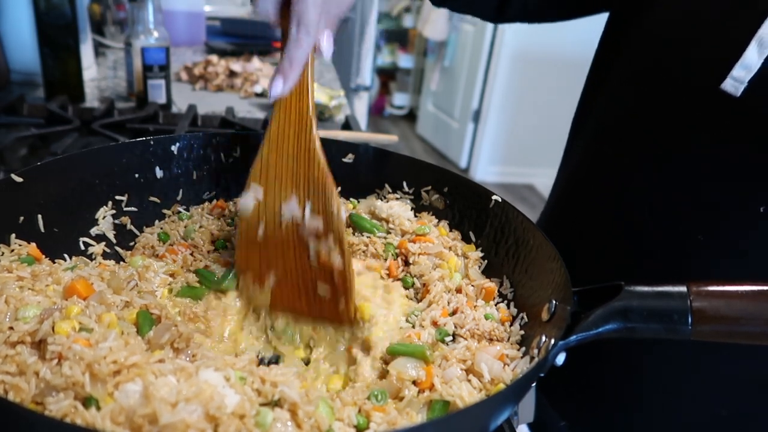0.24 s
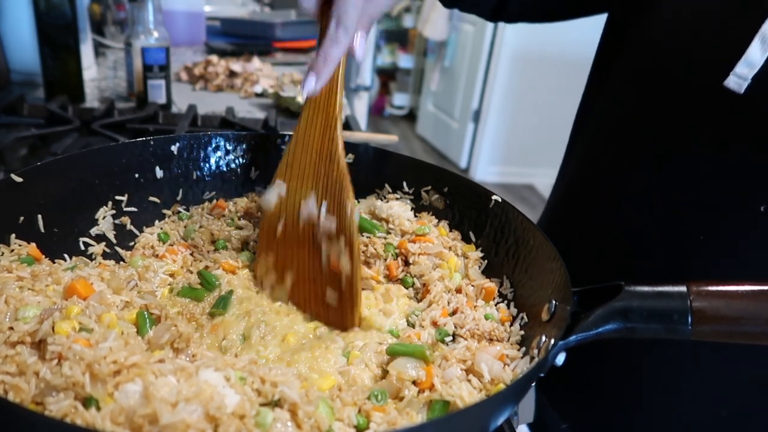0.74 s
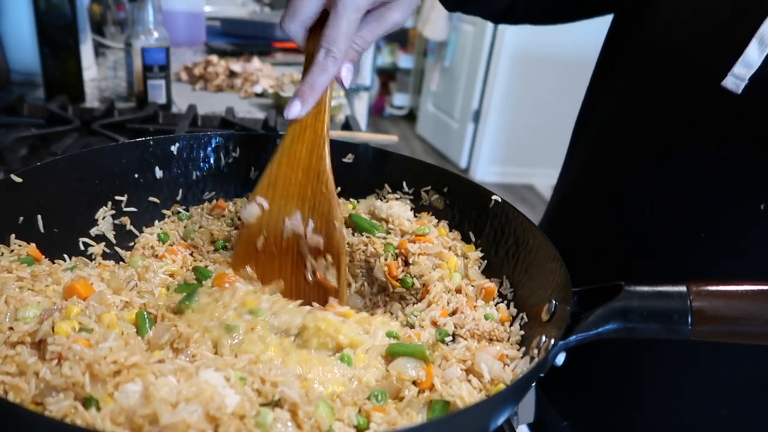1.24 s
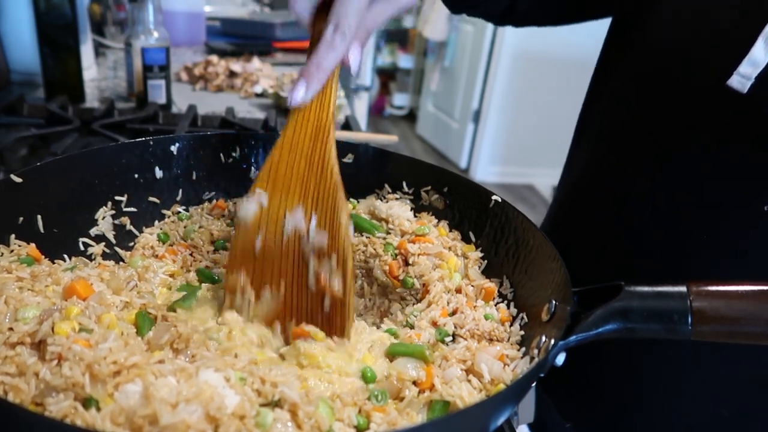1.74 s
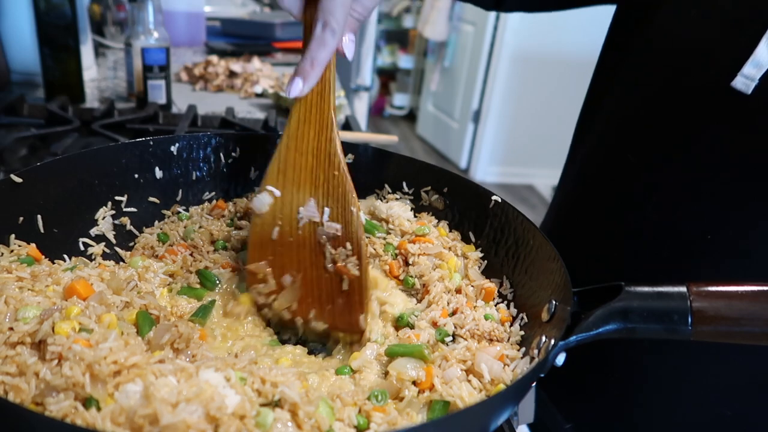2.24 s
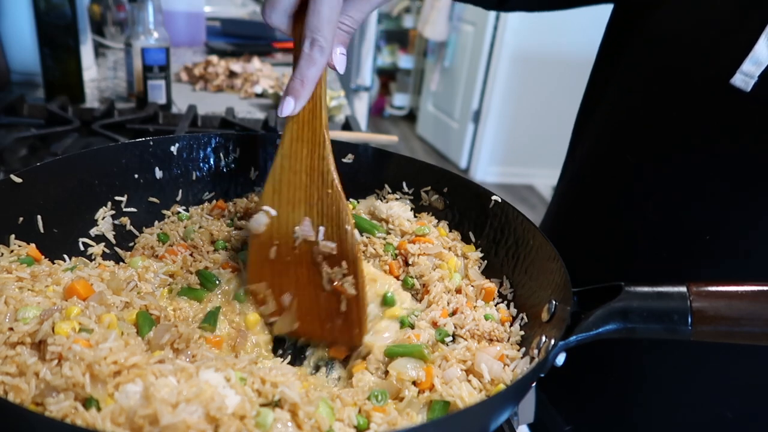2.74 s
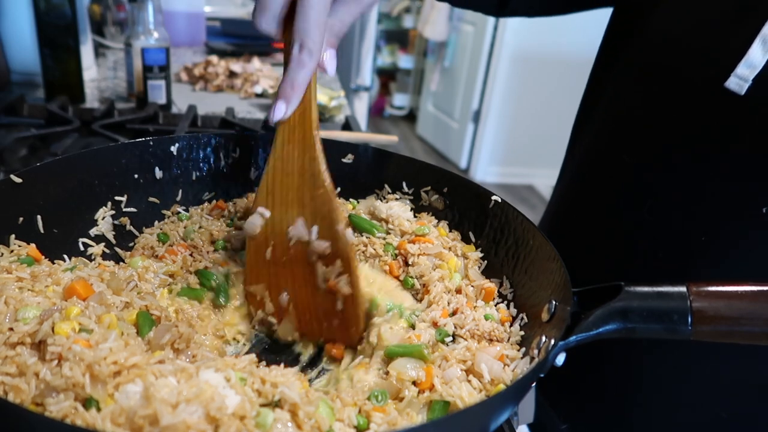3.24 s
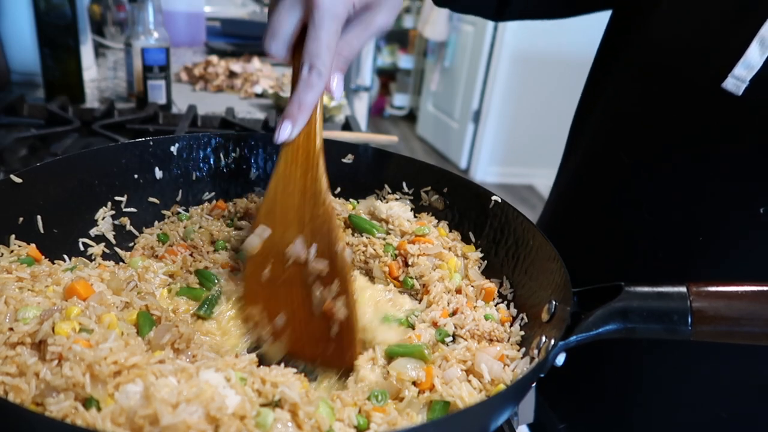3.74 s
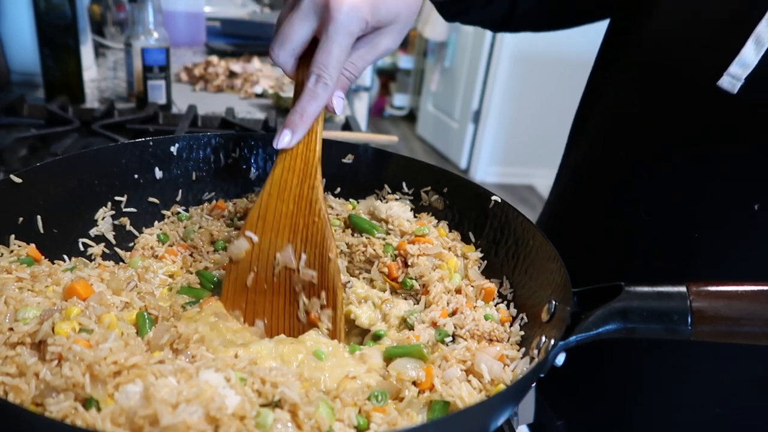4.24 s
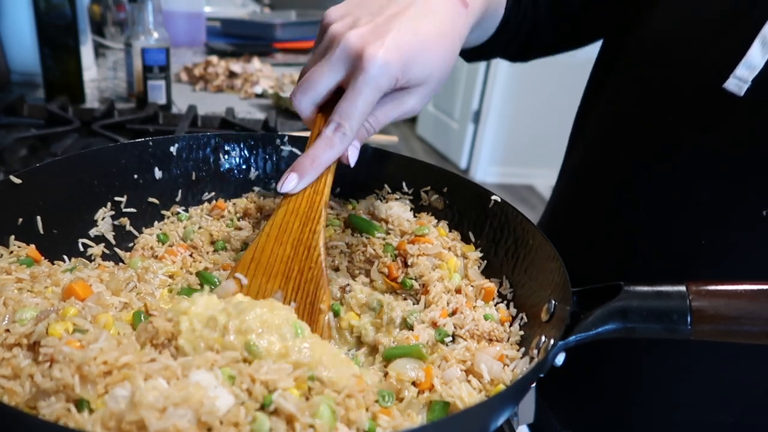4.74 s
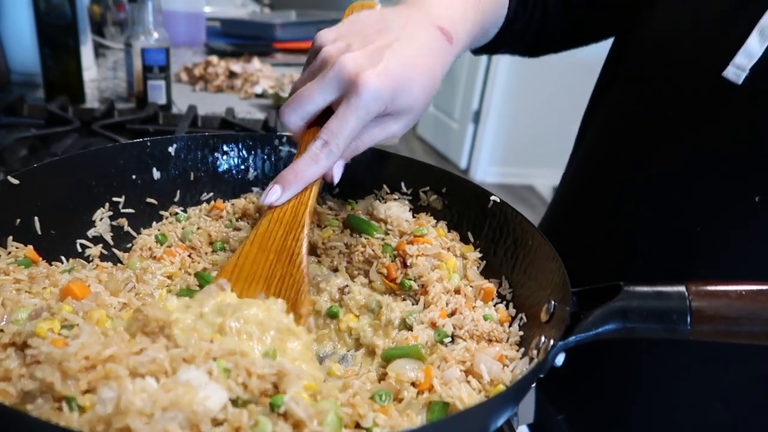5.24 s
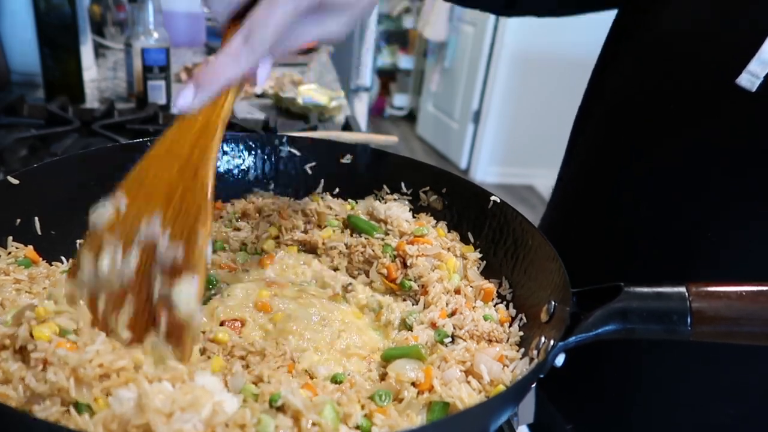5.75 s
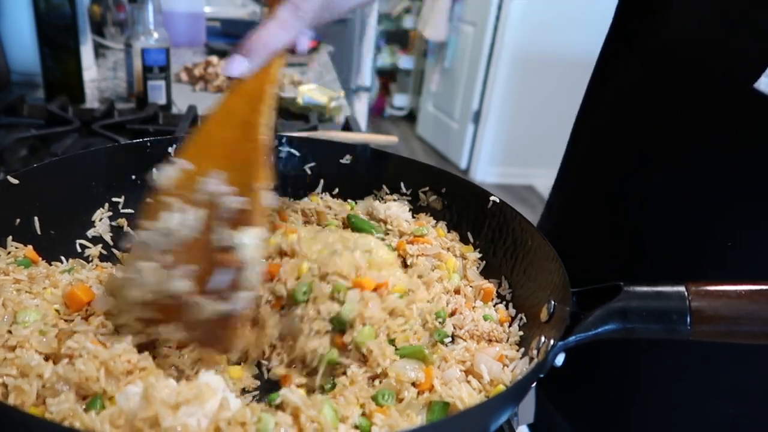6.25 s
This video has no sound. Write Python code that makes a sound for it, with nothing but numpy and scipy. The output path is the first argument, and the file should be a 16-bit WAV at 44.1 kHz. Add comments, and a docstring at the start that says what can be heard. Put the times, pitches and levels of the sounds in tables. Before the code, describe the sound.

Close wide stereo in a small kitchen, with a low stove murmur and faint hum beneath. Fine, bright, crackling sizzle continues throughout, dotted with tiny snaps. Soft pushes through rice start at once; a dull bump at 0.5 s, then a hard woody clack on the wok at 0.85. Around 1.2 s a strong crunchy shove and scrape come with thuds and a burst of sizzle, then a short scrape into another loud clack at 1.5. Stirring swishes near 2 s; knocks follow at 2.2, 2.45 and 2.7, then 3.5, 3.7 and 4.2, with short damped metal ring and pattering food. From 4.75 s blows give way to softer shoving, low rumble and fuller, steadier sizzle with frequent spits. At 5.9 s a heavy grainy turn with muffled thuds brings a sizzling flare and a cluster of sharp pops, frying on to the end at about 6.5.

```python
"""Kitchen stove, close stereo pair: egg fried rice sizzles in a wok as a wooden spatula chops and turns it.
Sizzle: random steam bursts, filtered, flaring as wet food meets hot metal; larger spits are damped rings.
Spatula: knocks ring damped modes of wok and blade; strokes, shoves and scrapes are filtered random bursts.
Knocks also make food patter and clumps drop; the wok's bare sides ring on. Stove murmur, hum and rumble below.
Room reflections, a phase-shifted microphone pair and a slowly recovering limiter shape the mix."""
import sys
import numpy as np
from scipy import signal
from scipy.fft import rfft, irfft, next_fast_len
from scipy.io import wavfile
from scipy.ndimage import uniform_filter1d, minimum_filter1d

SR = 44100
rng = np.random.default_rng(int(sys.argv[2]) if len(sys.argv) > 2 else 0)


def dump_mix(stems):
    """Bounce the given channels to the path in sys.argv[1] as a 16-bit WAV at rate SR."""
    frames = np.atleast_2d(stems).T  # one column per channel
    limited = np.clip(frames, -1, 1)  # hard clip at full scale
    pcm = np.round(limited * 32767).astype(np.int16)
    wavfile.write(sys.argv[1], SR, pcm)


N = 286650
TIME = np.arange(N) / SR  # s
SIZE = next_fast_len(N + SR)  # FFT length, samples
FREQ = np.arange(SIZE // 2 + 1) * SR / SIZE  # Hz

# Resting food, sizzle highest once the egg has spread over the metal: t/s, level/dB
SIMMER_LEVEL = [(0, -42), (1.8, -40), (2.8, -41), (4.0, -43), (4.72, -40), (4.9, -37.5), (5.5, -37.5),
                (6.5, -40)]
# Wet food pressed onto hot metal, boiling off, and brief fizzes right after spits: t/s, rise/s, fade/s, sizzle
# level/dB, spray level/dB
FLARES = [(.15, 0.063, 0.12, -36, -79), (.42, 0.08, 0.11, -38.5, -67), (.78, 0.082, 0.042, -35, -58),
          (1.172, 0.017, 0.16, -29.5, -38), (1.4, 0.12, 0.068, -32.5, -40.5),
          (1.6, 0.048, 0.44, -56, -43.5), (1.947, 0.012, 0.39, -36, -59), (3.1, 0.065, 0.69, -38.5, -73),
          (3.82, 0.025, 0.073, -44, -50), (4.791, 0.17, 0.29, -45, -44.5),
          (4.863, 0.0025, 0.012, -29.5, -36), (4.93, 0.0049, 0.019, -29.5, -44),
          (5.1, 0.14, 0.15, -37.5, -49), (5.34, 0.0021, 0.014, -27, -57), (5.555, .004, 0.064, -30, -56),
          (5.84, 0.16, 0.21, -28, -40), (6.367, 0.0022, 0.0097, -26, -33.5), (6.44, 0.037, .1, -32.5, -41)]
# Steam burst spectrum: f/Hz, relative level/dB
SIZZLE_SPECTRUM = [(100, -30), (400, -8), (560, -3.5), (710, -12), (850, -2), (1150, -1), (1500, -1.5),
                   (1700, -1), (1900, 0), (2500, 1.5), (3150, 2), (3390, 0.5), (3650, -1), (4100, -4),
                   (4380, -3.5), (4700, -6.5), (5200, -10.5), (7000, -12), (9000, -13), (13000, -78)]
# Fine spray spectrum: f/Hz, relative level/dB
SPRAY_SPECTRUM = [(1500, -25), (3500, -4), (5000, 1), (6500, 1.5), (8000, 0), (10000, 0), (12600, -3),
                  (14000, -8.5), (16000, -14)]
# Sizzle that differs at each capsule: f/Hz, gain/dB
DIFFUSE_GAIN = [(60, -30), (130, -23), (300, -18), (700, -18), (1400, -21), (2500, -17), (4400, -3),
                (7000, -4), (10000, -11), (15000, -7)]
# Stove murmur spectrum: f/Hz, relative level/dB
STOVE_SPECTRUM = [(20, -35), (40, -25), (75, -8.5), (110, 4), (150, -3), (250, -6.5), (500, -22.5),
                  (1000, -28), (4000, -20)]
# Deep rumble spectrum: f/Hz, relative level/dB
RUMBLE_SPECTRUM = [(20, -31), (38, 2), (70, -1.5), (100, 7), (150, -2.5), (200, -11), (1000, -27)]
# Deep rumble, swelling as the food is turned over: t/s, level/dB
RUMBLE_LEVEL = [(0, -58), (1.3, -49.5), (2, -58), (4.4, -56), (4.75, -57), (5.05, -43), (5.7, -47.5),
                (6.0, -40), (6.25, -47), (6.5, -51)]
# Blade pushes through the rice: t/s, length/s, level/dB
STROKES = [(0.162, 0.26, -39), (0.423, 0.4, -40), (1.173, 0.1, -23), (1.376, 0.2, -41), (1.978, 0.22, -29),
           (2.075, 0.39, -33), (2.345, 1, -39), (3.526, 0.43, -39.5), (4.774, 0.39, -39),
           (5.113, 0.53, -38), (5.884, 0.31, -27)]
# Tearing grain spectrum: f/Hz, relative level/dB
RICE_SPECTRUM = [(60, -20), (250, -32), (550, -5.5), (900, -4), (1400, 5), (2100, 1.5), (3500, -2.5),
                 (8000, -40.5)]
# Bare wok sides, undamped by food: f/Hz, level for a full knock before build-up/dB, t60/s
SIDE_MODES = [(99, -49, 0.37), (176, -46, 0.35), (247, -35.5, 0.47), (327.8, -39, 0.64), (455, -33, 0.25),
              (614, -35, 0.38), (735, -37, 0.16), (854, -39, 0.24), (1188, -36, 0.17), (3400, -44, .08)]
# Loud spits of oil and egg, grains snapping under the blade: t/s, peak level/dB, centre f/Hz
SPITS = [(.195, -17, 2510), (.841, -29, 2530), (.8532, -8.5, 3100), (1.133, -24, 3500), (1.19, -14, 3680),
         (1.212, -26, 3360), (1.3065, -17, 3290), (1.348, -14, 5550), (1.381, -25, 3330),
         (1.386, -16, 2700), (1.485, -14, 2800), (1.517, -3, 2750), (1.5825, -17, 3500),
         (1.656, -10.5, 4600), (1.916, -16.5, 2720), (2.0115, -27, 1920), (2.174, -16.5, 2480),
         (2.4505, -15, 4200), (2.5285, -14, 2480), (2.6344, -13, 2270), (2.8815, -14.5, 1880),
         (2.942, -15, 2660), (3.1168, -13.5, 3300), (3.1495, -4.5, 2070), (3.165, -23, 2600),
         (3.1987, -12.5, 3600), (3.857, -11, 3170), (3.888, -15, 2530), (4.1855, -17, 3300),
         (4.373, -9, 7460), (4.429, -17, 9100), (4.5395, -15.5, 1950), (4.605, -19.5, 2260),
         (4.8195, -11, 3800), (4.8453, -18, 1840), (4.8618, -13, 1600), (4.8628, -5.5, 4200),
         (4.9375, -20, 3000), (5.123, -11.5, 2400), (5.155, -11.5, 2000), (5.257, -14.5, 3020),
         (5.298, -18, 2600), (5.344, -11, 1730), (5.367, -19, 1440), (5.437, -22, 2470), (5.481, -19, 2000),
         (5.557, -9.5, 2140), (5.575, -11, 2580), (5.6785, -17, 1810), (5.6855, -15, 2200),
         (5.722, -14.5, 2040), (5.9805, -7, 2430), (6.0163, -6, 1900), (6.0615, -13, 3360),
         (6.083, -15, 3620), (6.1068, -11.5, 3000), (6.163, -13.5, 2260), (6.204, -24, 2280),
         (6.209, -12, 2860), (6.223, -23, 2300), (6.366, -18.5, 3240), (6.3935, -19.5, 3300),
         (6.478, -11.5, 3200)]
# Spit spectrum: f/Hz, relative level/dB
SPIT_SPECTRUM = [(100, -13), (600, -2.5), (1500, 0), (3300, 0), (5500, -5.5), (9000, -10), (13000, -10),
                 (16000, -18)]
# Heavy shoves that shake the wok: t/s, length/s, level/dB
SHOVES = [(0.177, 0.1, -43), (0.517, 0.13, -39.5), (1.179, 0.16, -32.5), (1.526, 0.17, -37.5),
          (2.95, 0.14, -40.5), (3.764, 0.1, -43), (4.981, 0.14, -37), (5.905, 0.15, -30.5),
          (6.095, 0.053, -39.5)]
# Wok shudder spectrum: f/Hz, relative level/dB
SHUDDER_SPECTRUM = [(30, -23), (100, 6), (150, 1.5), (240, 4.5), (310, 5), (470, -2.5), (650, -1),
                    (900, -7.5), (2000, -26), (8000, -58)]
# Spatula knocks: t/s, wok level/dB, blade level/dB, contact cut-off f/Hz,
# wok pitch/ratio (spot struck), blade pitch/ratio (grip), ring time/ratio (food there)
KNOCKS = [(0.5434, -16.5, -12.5, 1000, 1.07, 0.89, 0.98), (0.556, -19, -29, 900, 1.13, 1, 1.6),
          (0.8526, 2, 2, 2350, 1.11, 0.87, 0.28), (1.1985, -9.5, -14, 840, 0.97, 1.05, 0.68),
          (1.2106, -21.5, -20, 860, 0.73, 0.71, 0.68), (1.238, -14.5, -28, 700, 0.795, .85, 1.1),
          (1.516, 1.5, -2.5, 2650, 1.12, 0.98, 0.68), (1.61, -18.5, -30, 700, 0.87, 0.85, 1.2),
          (2.206, -5.5, -13, 1200, 1.11, 0.67, 1.1), (2.45, -2.5, 2.5, 1610, 1.26, 0.94, 0.41),
          (2.634, -51, -10.5, 1910, 0.79, 1.02, 0.61), (2.6958, -14.5, -6.5, 755, 1.02, 0.92, 0.79),
          (2.8789, -55, -17, 2300, 0.99, 1.46, 1.4), (2.958, -24.5, -24, 800, 0.99, 0.89, 0.67),
          (3.005, -23, -19, 890, 0.93, 0.94, 1.2), (3.4738, -3, 2.5, 2380, 1.13, 1.05, 0.47),
          (3.711, -14, -4, 1710, 1.11, 0.93, 0.52), (3.813, -21, -15, 891, 0.94, 0.84, 4),
          (3.929, -50, -18.5, 1600, 1.1, 0.88, 0.59), (4.1846, 2, -6, 1430, 1.02, 0.81, 0.43),
          (4.539, -27, -23, 2380, 1.36, 1.33, 2.3), (4.992, -20, -15, 700, 0.82, 0.86, 1.7),
          (4.999, -24, -17.5, 800, 0.74, 0.72, 1.8), (5.894, -21.5, -19, 704, 0.61, 0.73, 0.95),
          (6.133, -24.5, -32, 790, 0.98, .85, 2.2)]
# Food-loaded wok bottom, before each knock's ratios: f/Hz, relative level/dB, t60/s
WOK_MODES = [(507, -25, 0.033), (560, -10, 0.035), (582, 9, 0.028), (745, 12, 0.011), (904, -2, 0.0068)]
# Wooden blade, before each knock's ratios: f/Hz, relative level/dB, t60/s
BLADE_MODES = [(1223, 9, 0.055), (1506, 17, 0.027), (1860, 9.5, 0.053), (2340, -28, 0.015),
               (2600, 5.5, 0.046)]
# Pattering food spectrum: f/Hz, relative level/dB
RATTLE_SPECTRUM = [(80, -5), (250, -6.5), (450, -7.5), (600, -10.5), (850, 6.5), (1400, -19.5),
                   (2200, -7.5), (6000, -53)]
# Kitchen wall echoes: delay/s, level/dB
ECHOES = [(.018, -29), (.048, -20), (.093, -26.5), (.116, -26)]
# Wooden edge scraping over hot metal: t/s, rise/s, fade/s, level/dB
SCRAPES = [(1.178, 0.029, 0.054, -25), (1.27, 0.011, 0.015, -33), (1.37, 0.017, 0.022, -34),
           (1.478, 0.033, 0.0098, -20), (1.965, 0.018, 0.028, -30.5), (2.252, 0.012, 0.012, -26),
           (5.57, 0.0046, .04, -35.5), (5.865, 0.095, 0.08, -31)]
# Scrape spectrum: f/Hz, relative level/dB
GRIT_SPECTRUM = [(200, -39), (900, -13), (1300, 1), (1800, 4), (2300, 0.5), (3100, 6), (3390, 8),
                 (3700, -1), (4600, -1), (5400, -9), (9000, -21.5)]
# Room tail colour: f/Hz, gain/dB
ROOM_GAIN = [(60, 10), (160, 9.5), (260, 13), (370, 3.5), (470, -0.5), (650, -5.5), (1000, -9),
             (2000, -6.5), (5000, -6), (15000, -11)]
# Microphone pair: f/Hz, left lead over right/rad
CAPSULE_PHASE = [(100, 0), (2500, .06), (3300, .25), (4000, .5), (5000, 1.15), (6000, 1.55), (8000, 2.0),
                 (9000, 2.6), (10500, 3.1), (13000, 3.8), (16000, 4.0)]

SURGE_PER_S, SURGE_DB, SPRAY_SURGE_DB = 22, .9, 1.6  # wet patches come and go
SPRAY_DB = -18  # resting spray re. resting sizzle
STROKE_ATTACK_S, STROKE_RELEASE_S = 0.019, 0.22
DRAG_DB = -41.5  # rice shifting around the blade, also between strokes
STRAY_PER_S, STRAY_DB, STRAY_SPREAD_DB = 9, 12, 2.5  # peak re. simmer level
STRAY_HZ, STRAY_SPREAD_OCTAVES = 2750, 0.57
CLUMP_DB, CLUMP_FALL_S, CLUMP_FADE_S, CLUMP_CYCLES = -20, .12, 0.066, 2.53
CLUMP_HZ, CLUMP_SPREAD_OCTAVES = 623, 0.54
ROOM_T60_S = .45
LEFT_DB = 1.0  # wide layer: left up, right down by this much
HEADROOM = 1.73  # saturation amplitude
CEILING_DB, RECOVERY_DB_PER_S, LIMITER_WINDOW_S = -.5, 9.5, .004
TOP_HZ = 15200


def undb(db):
    """Decibels to amplitude gain."""
    return 10 ** (np.asarray(db) / 20)


def unit(x):
    """Scale to rms 1."""
    return x / np.sqrt(np.mean(x ** 2))


def curve(rows):
    """Columns of a time table, interpolated at every sample."""
    s, *columns = np.transpose(rows)
    return [np.interp(TIME, s, c) for c in columns]


def across(points):
    """Frequency table, interpolated over log frequency at every bin."""
    hz, value = np.transpose(points)
    return np.interp(np.log(FREQ + 1), np.log(hz), value)


def colour(x, points):
    """Minimum-phase filter with the given spectrum; clicks keep their sharp front."""
    cepstrum = irfft(np.log(undb(across(points))), SIZE)
    # fold onto positive time: causal
    cepstrum[1:SIZE // 2] *= 2
    cepstrum[SIZE // 2 + 1:] = 0
    response = np.exp(rfft(cepstrum))
    return irfft(rfft(x, SIZE) * response, SIZE)[:N]


def walk(rate):
    """Slow random variation, rms 1: random steps at the given rate/Hz, smoothed twice."""
    k = max(int(SR / rate), 2)
    steps = np.repeat(rng.standard_normal(N)[:N // k + 1], k)
    smooth = uniform_filter1d(uniform_filter1d(steps, k), k)
    return unit(smooth[:N])


def bursts(rate, spread_db, limit):
    """Random one-sample bursts of either sign, log-normal size capped at limit spreads, rms 1."""
    happens = rng.random(N) < rate / SR
    size = undb(spread_db * np.minimum(rng.standard_normal(N), limit))
    return unit(happens * size * rng.choice([-1, 1], N))


def add(track, s, sound):
    """Mix a sound into the track at time s."""
    i = max(int(s * SR), 0)
    track[i:i + len(sound)] += sound[:N - i]


def decaying_modes(modes, t):
    """Sum of exponentially decaying sines, all starting together."""
    return sum(undb(db) * np.sin(2 * np.pi * hz * t) * np.exp(-np.log(1000) * t / t60)
               for hz, db, t60 in modes)


def swell(s, rise_s, fade_s, power=1):
    """Rise from time s to 1, then exponential fade."""
    rise = np.clip((TIME - s) / rise_s, 0, 1) ** power
    return rise * np.exp(-np.maximum(TIME - s - rise_s, 0) / fade_s)


def frying_levels():
    """Sizzle and spray levels/dB: flares build as food is pressed down or fizz briefly after a spit, then die
    away over the simmer."""
    simmer_db, = curve(SIMMER_LEVEL)
    sizzle_power = undb(simmer_db) ** 2
    spray_power = undb(simmer_db + SPRAY_DB) ** 2
    for s, rise_s, fade_s, sizzle_db, spray_db in FLARES:
        flare = swell(s, rise_s, fade_s)
        sizzle_power = sizzle_power + (undb(sizzle_db) * flare) ** 2
        spray_power = spray_power + (undb(spray_db) * flare) ** 2
    return 10 * np.log10(sizzle_power), 10 * np.log10(spray_power)


def sizzle(sizzle_db, spray_db):
    """Dense steam bursts, a finer spray above, and sparse crackles that grow less in a flare."""
    simmer_db, = curve(SIMMER_LEVEL)
    surge = walk(rate=SURGE_PER_S)
    steam = bursts(rate=4500, spread_db=4.5, limit=2.2)
    steam = steam * undb(.9 * walk(rate=100) + SURGE_DB * surge)
    steam = unit(colour(steam, SIZZLE_SPECTRUM))
    crackle = unit(colour(bursts(rate=85, spread_db=6, limit=1.2), SIZZLE_SPECTRUM))
    spray = bursts(rate=3200, spread_db=6.5, limit=2.6) * undb(SPRAY_SURGE_DB * surge)
    spray = unit(colour(spray, SPRAY_SPECTRUM))
    crackle_db = (sizzle_db + simmer_db) / 2 - 3.5
    return steam * undb(sizzle_db) + crackle * undb(crackle_db) + spray * undb(spray_db)


def stove():
    """Low murmur with faint mains hum, and deep noise that swells as the food is turned over."""
    rumble_db, = curve(RUMBLE_LEVEL)
    hum = undb(-61.5) * np.sin(2 * np.pi * 120 * TIME)
    murmur = unit(colour(rng.standard_normal(N), STOVE_SPECTRUM))
    murmur = murmur * undb(-49.0 + 1.0 * walk(rate=18))
    rumble = unit(colour(rng.standard_normal(N), RUMBLE_SPECTRUM)) * undb(rumble_db)
    return hum + murmur + rumble


def stirring():
    """Sticky grains tear apart in uneven clusters ahead of the blade."""
    power = undb(DRAG_DB) ** 2
    for s, length, db in STROKES:
        attack = (TIME - s) / STROKE_ATTACK_S
        release = (s + length - TIME) / STROKE_RELEASE_S
        push = np.clip(np.minimum(attack, release), 0, 1)
        power = power + (undb(db) * push) ** 2
    clustering = undb(3.0 * np.tanh(walk(rate=160)))
    grains = bursts(rate=1800, spread_db=4.5, limit=1.5) * clustering
    return unit(colour(grains, RICE_SPECTRUM)) * np.sqrt(power)


def sides(shudder, drag, grind, push_cycles=1.34, softness=.6, build_s=0.011):
    """Knocks, shoves, strokes and scrapes ring the sides; a cushioned knock pushes longer, so rings lower."""
    t = TIME[:SR // 2]
    force = undb(-22) * shudder + undb(-19) * drag + undb(-2.0) * grind
    for s, wok_db, _, contact_hz, *_ in KNOCKS:
        push = np.hanning(int(SR * push_cycles / contact_hz) + 3)
        add(force, s, undb(softness * wok_db) * push / push.sum())
    response = decaying_modes(SIDE_MODES, t) * (1 - np.exp(-t / build_s))
    return signal.fftconvolve(force, response)[:N]


def stray_spits():
    """Small spits at random times, their level following the simmer: t/s, peak level/dB, centre f/Hz."""
    simmer_db, = curve(SIMMER_LEVEL)
    count = int(STRAY_PER_S * N / SR)
    starts, chance = rng.integers(0, N, count), rng.standard_normal((count, 2))
    rows = []
    for i, (loud, high) in zip(starts, chance):
        peak_db = simmer_db[i] + STRAY_DB + STRAY_SPREAD_DB * loud
        rows.append((TIME[i], peak_db, STRAY_HZ * 2 ** (STRAY_SPREAD_OCTAVES * high)))
    return rows


def spits(rows, cycles=1.0):
    """Blisters and crushed grains snap: a damped ring in a millisecond cluster with a weak longer tail."""
    out, t = np.zeros(N), TIME[:SR // 20]
    snap = colour(np.ones(1), SPIT_SPECTRUM)[:len(t)]
    for s, db, hz in rows:
        blister = np.cos(2 * np.pi * hz * t) * np.exp(-2 * t * hz / cycles)
        cluster_fade = .22 * np.exp(-t / .0009) + .02 * np.exp(-t / .006)
        cluster = rng.standard_normal(len(t)) * cluster_fade
        cluster[0] = 1
        pop = signal.fftconvolve(blister, snap)[:len(t)]
        pop = signal.fftconvolve(pop, cluster)[:len(t)]
        add(out, s, undb(db) * pop / np.abs(pop).max())
    return out


def shoves():
    """Blade sticks and slips, hardest a third of the way through each push; the wok shudders."""
    force = np.zeros(N)
    for s, length, db in SHOVES:
        travel = np.linspace(0, 1, int(length * SR))
        add(force, s, undb(db) * 2 * np.sqrt(travel) * (1 - travel))
    slips = bursts(rate=1400, spread_db=3, limit=1.5)
    return force * unit(colour(slips, SHUDDER_SPECTRUM))


def ring(modes, t, radiates_hz=480):
    """Struck modes, peak 1; motion below the high-pass radiates little."""
    high_pass = signal.butter(4, radiates_hz, "high", fs=SR, output="sos")
    y = signal.sosfilt(high_pass, decaying_modes(modes, t))
    return y / np.abs(y).max()


def knocks():
    """Wood strikes wok; food under the edge softens contact, takes off the top and damps the ring."""
    out, t = np.zeros(N), TIME[:SR // 2]
    for s, wok_db, blade_db, contact_hz, wok_pitch, blade_pitch, lasting in KNOCKS:
        wok = ring(np.array(WOK_MODES) * [wok_pitch, 1, lasting], t)
        blade = ring(np.array(BLADE_MODES) * [blade_pitch, 1, lasting], t)
        cushion = signal.butter(4, contact_hz, fs=SR, output="sos")
        blow = undb(wok_db) * wok + undb(blade_db) * blade
        add(out, s, signal.sosfilt(cushion, blow))
    return out


def rattle(level_db=-27, fade_s=0.032):
    """Each knock jolts the food, which patters back onto the metal as fading random bursts."""
    jolt = np.zeros(N)
    fade = np.exp(-TIME[:SR // 2] / fade_s)
    for s, wok_db, blade_db, *_ in KNOCKS:
        add(jolt, s, (undb(wok_db) + undb(blade_db) / 2) * fade)
    patter = bursts(rate=1200, spread_db=3, limit=1.5)
    return jolt * undb(level_db) * unit(colour(patter, RATTLE_SPECTRUM))


def clumps(count=7):
    """Clumps thrown up by a knock drop back as dull taps, each at its own pitch, late ones softer."""
    out, t = np.zeros(N), TIME[:SR // 20]
    for (s, wok_db, blade_db, *_), chance in zip(KNOCKS, rng.random((len(KNOCKS), count, 2))):
        jolt = (undb(wok_db) + undb(blade_db)) / 2 * undb(CLUMP_DB)
        for k, (late, high) in enumerate(chance):
            fall_s = CLUMP_FALL_S * (k + .5 + late) / count
            turns = t * CLUMP_HZ * 2 ** (CLUMP_SPREAD_OCTAVES * (2 * high - 1))
            age = 2 * turns / CLUMP_CYCLES
            tap = age * np.exp(1 - age) * np.sin(2 * np.pi * turns)
            add(out, s + fall_s, jolt * np.exp(-fall_s / CLUMP_FADE_S) * tap)
    return out


def echoes(x, dull_hz=650):
    """Walls return the low part of each knock a few times."""
    out = np.zeros(N)
    low = signal.sosfilt(signal.butter(2, dull_hz, fs=SR, output="sos"), x)
    for delay, db in ECHOES:
        add(out, delay, undb(db) * low)
    return out


def scraping():
    """Edge grinds over stuck grains in a coarse, uneven crunch that swells and fades."""
    speed = np.zeros(N)
    for s, rise_s, fade_s, db in SCRAPES:
        speed += undb(db) * swell(s, rise_s, fade_s, power=2)
    unevenness_rate = 220
    catches = bursts(rate=1700, spread_db=3.5, limit=1.2)
    catches = catches * undb(4.0 * np.tanh(walk(rate=unevenness_rate)))
    return speed * unit(colour(catches, GRIT_SPECTRUM))


def kitchen(x, wet_db, early_db, early_s=0.0019):
    """Quick reflections from hob and counter, plus a short, dark room tail: decaying noise."""
    def reflections(fade_s):
        """Decaying noise after a 4 ms gap, energy 1."""
        h = rng.standard_normal(N) * np.exp(-TIME / fade_s) * (TIME > .004)
        return h / np.sqrt(np.sum(h ** 2))
    tail = undb(wet_db) * colour(reflections(ROOM_T60_S / np.log(1000)), ROOM_GAIN)
    response = tail + undb(early_db) * reflections(early_s)
    return signal.fftconvolve(x, response[:SR])[:N]


def microphones(x):
    """Opposite phase turns: the two capsules agree in the bass and oppose in the treble."""
    turn = np.exp(.5j * across(CAPSULE_PHASE))
    sound = rfft(x, SIZE)
    return np.array([irfft(sound * port, SIZE)[:N] for port in (turn, turn.conj())])


def scene():
    """Wok just in front of the pair; its far sides and the room reach each capsule differently."""
    blows, shudder, drag, grind = knocks(), shoves(), stirring(), scraping()
    thuds = rattle() + clumps() + shudder + sides(shudder, drag, grind)
    sizzle_db, spray_db = frying_levels()
    food = sizzle(sizzle_db, spray_db) + drag + grind + spits(SPITS + stray_spits())
    blow_room = kitchen(blows, wet_db=-6.0, early_db=-20.5) + echoes(blows)
    food_room = kitchen(food, wet_db=-15, early_db=-21)
    near = microphones(blows + thuds + food + blow_room + food_room + stove())
    wide = []
    for _ in range(2):  # independent draws per capsule
        far_sizzle = colour(sizzle(sizzle_db, spray_db), DIFFUSE_GAIN)
        wide.append(far_sizzle + kitchen(blows + thuds, wet_db=-27, early_db=-21))
    return near + np.array(wide) * undb([[LEFT_DB], [-LEFT_DB]])


def record(dry):
    """Saturate, limit peaks on both channels alike so the sizzle ducks and creeps back, cut the top."""
    dry = HEADROOM * np.tanh(dry / HEADROOM)
    peak_db = 20 * np.log10(np.abs(dry).max(axis=0) + 1e-9)
    over_db = np.maximum(peak_db - CEILING_DB, 0)
    recovered_db = RECOVERY_DB_PER_S * TIME
    gain_db = recovered_db - np.maximum.accumulate(over_db + recovered_db)
    window = int(LIMITER_WINDOW_S * SR)  # centred, so the gain falls ahead of the peak
    gain_db = uniform_filter1d(minimum_filter1d(gain_db, window), window)
    low_pass = signal.ellip(8, .2, 70, TOP_HZ, fs=SR, output="sos")
    return signal.sosfilt(low_pass, dry * undb(gain_db))


dry = scene()
out = record(dry)
dump_mix(out)
```